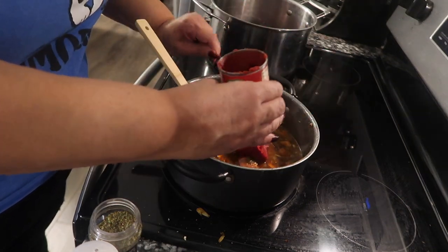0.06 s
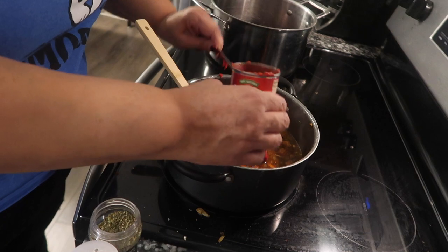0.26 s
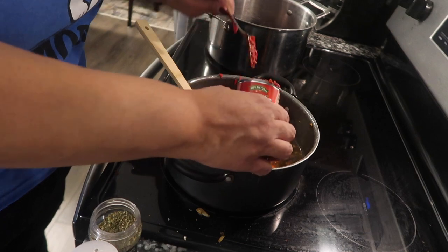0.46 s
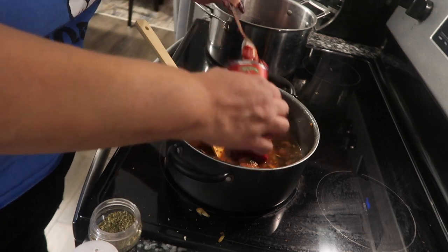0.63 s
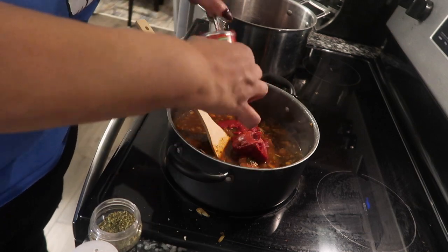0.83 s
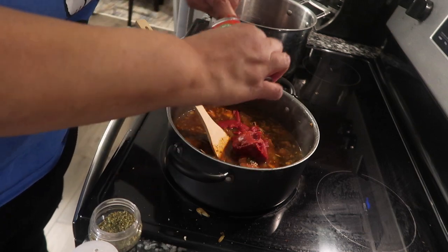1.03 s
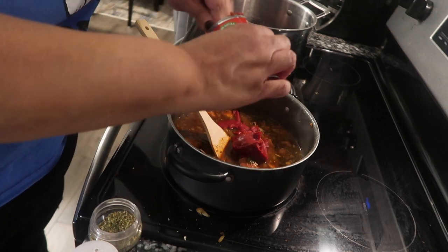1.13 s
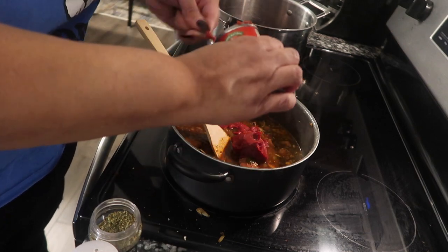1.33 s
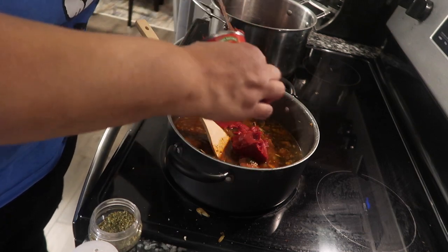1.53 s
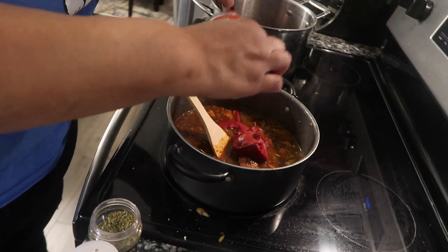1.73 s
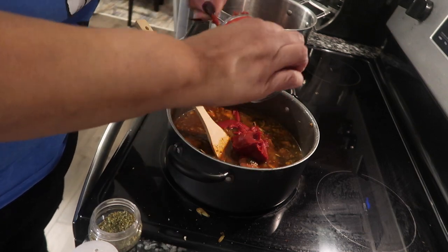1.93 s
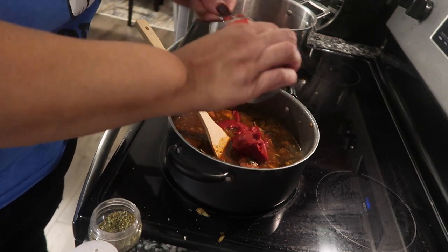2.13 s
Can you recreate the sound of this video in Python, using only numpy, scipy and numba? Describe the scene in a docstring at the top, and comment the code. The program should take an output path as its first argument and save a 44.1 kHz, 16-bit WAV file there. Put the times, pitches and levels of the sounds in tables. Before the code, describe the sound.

A metal spoon scrapes out a small can. A pot-rim knock is already ringing at 0 s; a clean, louder-standing knock follows at 0.17 s. Faint scuffs come near 0.4-0.6 s, then hollow taps and rapid gritty scrapes from 0.8 to 1.5 s, strongest around 1.2. Small handle rubs at 1.55-1.65 s lead to shorter, duller scrapes and taps until 2.15 s. Close stereo, brief kitchen reverberation, quiet low hum slowly swelling.

```python
"""A metal spoon's knock on a pot rim is already ringing, and a second, clean knock soon follows: cracks and pot modes.
The spoon then scuffs, scrapes and taps in a small paste-lined can held in the hand: slips and taps ring its modes.
The home kitchen answers briefly with a tail of dying noise. Room air and an appliance hum, made of filtered noise,
lie underneath; they sink at first, then swell slowly. Two close microphone ports give the stereo picture."""
import sys
import numpy as np
from scipy import signal
from scipy.fft import rfft, irfft, next_fast_len
from scipy.io import wavfile
from scipy.ndimage import uniform_filter1d
from numba import njit

SR = 44100
rng = np.random.default_rng(int(sys.argv[2]) if len(sys.argv) > 2 else 0)


def amplitude_ratio(level_db):
    """Convert a level in decibels to the matching linear amplitude (field) ratio."""
    exponent = np.asarray(level_db, float) / 20
    return 10 ** exponent


def pcm_store(signal):
    """Save signal as 16-bit PCM."""
    levels = np.round(np.clip(np.atleast_2d(signal), -1, 1) * 32767)
    wavfile.write(sys.argv[1], SR, levels.astype(np.int16).T)


N = 96446
LEAD = 4096  # samples run before the first one heard, so that sounds can already be ringing
M = N + LEAD
T = (np.arange(M) - LEAD) / SR  # seconds from the first sample heard

# How far apart the two ports hear the room: (frequency [Hz], side minus mid before a further gain [dB])
SURROUND_SIDE = [(60, -40), (180, -13), (550, -11.5), (1650, -19), (4970, -1), (15000, 10.5)]


def rms_one(x):
    """Scales a signal to an rms of 1."""
    return x / np.sqrt(np.mean(x ** 2) + 1e-20)


def at_hz(points, hz):
    """Reads a (frequency, value) curve along a logarithmic frequency axis."""
    known_hz, values = np.array(points)[:, 0], np.array(points)[:, 1]
    return np.interp(np.log(hz + 1e-9), np.log(known_hz + 1e-9), values)


def band_pass(x, order, edges_hz):
    """Butterworth band-pass."""
    return signal.sosfilt(signal.butter(order, edges_hz, "band", fs=SR, output="sos"), x)


def drift(rate):
    """Slow random wandering with an rms of 1; rate is the corner [Hz] of its two-pole low-pass."""
    r = np.exp(-80 * np.pi * rate / SR)  # computed on every 40th sample
    noise = rng.standard_normal(M // 40 + 1002)
    slow = signal.lfilter([1], [1, -2 * r, r * r], noise)[1000:]
    return np.interp(np.arange(M) / 40, np.arange(len(slow)), rms_one(slow))


def colour(x, spectrum, turn=False):
    """Gives x a dB spectrum: by a causal minimum-phase filter, or with every phase turned a quarter cycle."""
    size = next_fast_len(M + LEAD)
    log_gain = at_hz(spectrum, np.arange(size // 2 + 1) * SR / size) * np.log(10) / 20
    cepstrum = irfft(log_gain, size)
    cepstrum[1:size // 2] *= 2  # folding the cepstrum forward makes the phase minimal
    cepstrum[size // 2 + 1:] = 0
    response = np.exp(rfft(cepstrum))
    if turn:
        response = 1j * np.abs(response)
    return irfft(rfft(x, size) * response, size)[:M]


def ring(clicks, hz, t60):
    """A two-pole resonator: a unit click sets a dying sine of starting height 1 ringing."""
    r = amplitude_ratio(-60 / (max(t60, .003) * SR))
    w = 2 * np.pi * hz / SR
    return signal.lfilter([0, np.sin(w)], [1, -2 * r * np.cos(w), r * r], clicks + 1e-18)


def spikes(s, heights):
    """Single-sample clicks at the given seconds."""
    out = np.zeros(M)
    np.add.at(out, (np.asarray(s) * SR).astype(int) + LEAD, heights)
    return out


def burst(clicks, t60, spectrum):
    """Each click lets off coloured noise that dies away exponentially."""
    dying = signal.lfilter([1], [1, -amplitude_ratio(-60 / (t60 * SR))], np.abs(clicks))
    white = rng.standard_normal(M)
    return colour(dying * white, spectrum) / np.std(colour(white, spectrum))


def knocks():
    """Spoon on pot rim: each hit and its quick bounce let off a crack of noise and ring the pot's modes."""
    # Spoon against the rim: (time [s], relative level [dB])
    hits = [(-.02, -7), (0.1728, -6.5)]
    # Noise of the crack: (frequency [Hz], relative density [dB per Hz])
    crack_spectrum = [(59, -27), (100, -6.5), (367, -7.5), (700, -0.5), (2180, -4.5), (2990, -3),
                      (4640, -25), (7050, -16), (15000, -60.5)]
    # Modes of the pot: (frequency [Hz], relative level [dB], t60 [s])
    pot_modes = [(192.2, -2.5, 0.16), (363.7, -6.5, 0.26), (465, -3, 0.11), (916.4, -4, 0.16),
                 (2430, 9.5, 0.056), (2961, 7.5, 0.061)]
    bounce_s, bounce_db = 0.002, -12
    crack_t60_s, crack_db, pot_db = 0.062, -6, -16.5

    s, db = np.transpose(hits)
    clicks = spikes(s, amplitude_ratio(db)) - spikes(s + bounce_s, amplitude_ratio(db + bounce_db))
    crack = amplitude_ratio(crack_db) * burst(clicks, crack_t60_s, crack_spectrum)
    pot = sum(amplitude_ratio(pot_db + d) * ring(clicks, hz, t60) for hz, d, t60 in pot_modes)
    return crack + pot


def room(x):
    """Kitchen reverberation: dense noise tails dying band by band, one for mid and one for side."""
    # Decay of the kitchen: (frequency [Hz], t60 [s])
    decay = [(500, 0.71), (2500, 0.53), (6000, 0.56), (12000, 0.3)]
    build_up_s = 0.0045

    t = np.arange(SR) / SR
    edges = 60 * 2 ** np.arange(0, 8.1, .5)  # half-octave bands [Hz]
    white = rng.standard_normal((2, 2, SR))
    tails = 0
    for k, (low, high) in enumerate(zip(edges, edges[1:])):
        band = band_pass(white[k % 2], 2, [low, high])  # neighbouring bands use different noise
        tails = tails + band * amplitude_ratio(-60 * t / at_hz(decay, np.sqrt(low * high)))
    tails = tails * np.minimum(t / build_up_s, 1)
    tails = tails / np.sqrt(np.sum(tails[0] ** 2))
    return signal.fftconvolve(x[None], tails, axes=1)[:, :M]


def background():
    """Room air is coloured noise, the hum noise through narrow resonators; mid and side share one level."""
    # Noise of the room air: (frequency [Hz], relative density [dB per Hz])
    air_spectrum = [(40, -9), (64, -9), (140, -15), (333, -19.5), (700, -23.5), (2500, -31.5), (5000, -41),
                    (10800, -56.5), (15500, -70)]
    # Appliance hum: (frequency [Hz], nominal width [Hz], level relative to the air in mid [dB])
    hum_lines = [(57.8, 7.2, 1), (184.3, 6.5, -3.5), (384, 16, -12.5)]
    # Swell of the whole background: (time [s], level [dB])
    swell_points = [(0.0, -44.5), (0.43, -55), (2.19, -42.5)]
    apart_db = 2

    white = rng.standard_normal((3, M))
    air = rms_one(colour(white[0], air_spectrum))
    apart = colour(colour(white[1], air_spectrum), SURROUND_SIDE)
    apart = apart * np.std(air) / np.std(colour(white[0], air_spectrum)) * amplitude_ratio(apart_db)
    hum = sum(amplitude_ratio(d) * rms_one(ring(white[2], hz, 1.9 / width)) for hz, width, d in hum_lines)
    level = np.interp(T, *np.transpose(swell_points))
    return amplitude_ratio(level) * np.array([air + hum, apart])


def grip():
    """Fingers shifting on the can: random rubs ring dull, heavily damped resonators at scattered pitches."""
    # Fingers on the can: (time [s], level [dB])
    finger_level = [(.3, -69), (.7, -75), (1.45, -45.5), (2.19, -64.5)]
    rubs_per_s, low_hz, high_hz, pitches = 260, 280, 1500, 14
    first_cycles, second_cycles = 18, 7.2  # t60 of the two resonators, in cycles

    rubs = (rng.random(M) < rubs_per_s / SR) * amplitude_ratio(np.minimum(rng.exponential(1, M), 3.0))
    dealt = rng.integers(0, pitches, M)  # each rub falls to one pitch
    rings = 0
    for k, hz in enumerate(np.geomspace(low_hz, high_hz, pitches)):
        softened = ring(rubs * (dealt == k), hz, first_cycles / hz)
        rings = rings + ring(softened, hz, second_cycles / hz) * hz
    return rms_one(rings) * amplitude_ratio(np.interp(T, *np.transpose(finger_level)))


def scuffs():
    """Spoon handle on the lip: dying noise rubs one small resonance, pitched a little differently each time."""
    # Small scuffs: (time [s], peak level [dB])
    handle_scuffs = [(0.4115, -42.5), (0.5721, -52.5), (1.5394, -38), (1.5718, -42), (1.595, -49),
                     (1.6257, -45), (1.6606, -34)]
    mode_hz, pitch_spread, mode_t60_s = 1251, 0.027, 0.03
    rub_s = 0.0048  # time constant of the rub

    chance = rng.standard_normal(len(handle_scuffs))
    white = rng.standard_normal(M)
    out = 0
    for (s, db), bent in zip(handle_scuffs, chance):
        rub = np.exp(-np.clip(T - s, 0, 1) / rub_s) * (T > s) * white
        note = ring(rub, mode_hz * (1 + pitch_spread * bent), mode_t60_s)
        out = out + amplitude_ratio(db) * note / np.abs(note).max()
    return out


def strokes():
    """Scraping pressure swells to a peak and lets go, with judder; gains for wall, bottom and treble."""
    # Strokes along the wall; the three times are sorted before use: (start [s], peak [s], end [s],
    # relative level [dB], bottom ring re wall [dB], treble re wall [dB])
    scrapes = [(0.788, 0.795, 0.9, -52, 7, 5.5), (0.801, 0.848, 0.95, -35, -12.5, -6.5),
               (0.907, 0.928, 1.01, -36, -8, -0.5), (0.988, 1.002, 1.083, -28.5, -9, 0.5),
               (1.045, 1.113, 1.32, -33.5, -9, -5.5), (1.13, 1.236, 1.338, -23, -15.5, -10.5),
               (1.396, 1.392, 1.48, -40.5, -20, -2.5), (1.423, 1.486, 1.515, -36, -1, 0),
               (1.692, 1.732, 1.756, -30, 5.5, 0.5), (1.742, 1.793, 1.889, -34.5, 3, 0.5),
               (1.81, 1.899, 1.95, -35.5, 7.5, -1), (1.935, 1.992, 2.073, -37.5, 5.5, 1.5),
               (1.988, 2.041, 2.058, -33.5, -13, 3)]
    shape, judder_db, judder_hz = 1.27, 2, 205

    out = 0
    for *times, db, bottom_db, treble_db in scrapes:
        swell = np.interp(T, np.sort(times), [0, 1, 0]) ** shape
        out = out + swell * amplitude_ratio(db + np.array([[0], [bottom_db], [treble_db]]))
    return out * amplitude_ratio(judder_db * drift(judder_hz))


@njit
def ring_bent(clicks, w, r):
    """A mode whose pitch and damping move while it rings: a complex number turned and shrunk each sample."""
    out, z = np.zeros(len(clicks)), 0j
    for i in range(len(clicks)):
        z = z * r[i] * np.exp(1j * w[i]) + clicks[i]
        out[i] = z.imag
    return out


def patchy(x):
    """Each slice of the treble comes and goes on its own."""
    patch_db, patch_hz = 2.5, 17.8
    edges = np.geomspace(2000, 16000, 10)
    out = 0
    for pair in zip(edges, edges[1:]):
        out = out + amplitude_ratio(patch_db * drift(patch_hz)) * band_pass(x, 2, pair)
    return out


def can():
    """Taps and a dense run of slips strike the same modes; the grip keeps changing which modes speak."""
    # Spoon taps in the can: (time [s], relative level [dB], bottom ring re wall [dB])
    spoon_taps = [(0.8724, -8.5, 10), (0.9503, -16.5, 5.5), (0.9966, -17, -25), (1.1345, -18, -10),
                  (1.207, -23, -0.5), (1.2238, -12, 0), (1.2333, -15.5, 1), (1.2474, -15.5, 0.5),
                  (1.2639, -20, -11), (1.295, -13.5, 1.5), (1.4423, -19, 0), (1.7324, -27, 7.5),
                  (1.7913, -19.5, -18), (2.0263, -15.5, -2.5), (2.1335, -30, -7), (2.1442, -13.5, 0.5)]
    # Can wall, damped by hand and paste: (frequency before bending [Hz], relative level [dB], t60 [s])
    wall_modes = [(1684, -12.5, 0.01), (2190, 4, 0.012), (2440, -39, 0.048), (2412, 4.5, 0.016),
                  (2600, -2, 0.042), (3052, -2, 0.025), (3371, -6, 0.045), (3733, -6.5, 0.021),
                  (4970, -4, 0.0074)]
    # Can bottom and cavity: (frequency before bending [Hz], relative level [dB], t60 before bending [s])
    bottom_modes = [(728, -21.5, 0.12), (837, -4.5, 0.067), (869.3, -8.5, 0.12), (918, -18.5, 0.11),
                    (1049, -16, 0.047)]
    # Hand and spoon bend the tuning: (time [s], bottom pitch [factor], wall pitch [factor],
    # bottom ring length [factor])
    bend_points = [(0.87, 1.076, 1.02, 1.94), (1.1, 0.98, .99, 1.2), (1.699, 0.95, 0.96, 0.87),
                   (2.03, .93, 0.91, 0.94), (2.13, 0.96, 1.004, 0.75)]
    # Noise of ticks and grit: (frequency [Hz], relative density [dB per Hz])
    treble_spectrum = [(2000, -19), (3500, -1.5), (6900, -12), (10500, -31), (11800, -48.5), (14500, -25)]
    tap_db, tick_db, drag_db, grit_db = -13, -24.5, -29, 0
    slips_per_s, slip_spread_db = 2300, 1.5
    mode_drift_db, mode_drift_hz = 4, 13
    wander_share, wander_hz = 0.013, 13.3
    tap_smear_s, tick_rise_s, treble_t60_s = 0.0017, 0.00061, 0.069
    hiss_share = 2.45  # smooth noise against the slips in the grit

    s, db, bottom_db = np.transpose(spoon_taps)
    press = strokes()
    at, *factors = np.transpose(bend_points)
    bottom_pitch, wall_pitch, bottom_length = [np.interp(T, at, f) for f in factors]
    wander = 1 + wander_share * drift(wander_hz)

    slip_heights = amplitude_ratio(slip_spread_db * np.minimum(rng.exponential(1, M), 4))
    slips = (rng.random(M) < slips_per_s / SR) * slip_heights * rng.choice([-1, 1], M)
    slips = rms_one(slips)

    modes = wall_modes + bottom_modes
    late = rng.random((len(s), len(modes))) * tap_smear_s  # wall modes start at scattered moments
    body = 0
    for k, (hz, d, t60) in enumerate(modes):
        if k >= len(wall_modes):
            taps = spikes(s, amplitude_ratio(db + tap_db + bottom_db))
            pressure, pitch, length = press[1], bottom_pitch, bottom_length
        else:
            taps = spikes(s + late[:, k], amplitude_ratio(db + tap_db))
            pressure, pitch, length = press[0], wall_pitch, np.ones(M)
        mode_gain = amplitude_ratio(drag_db + mode_drift_db * drift(mode_drift_hz))
        drag = pressure * np.roll(slips, 97 * k) * mode_gain  # each mode gets the slips at its own offset
        w = 2 * np.pi * hz / SR * pitch * wander
        body = body + amplitude_ratio(d) * ring_bent(taps + drag, w, amplitude_ratio(-60 / (t60 * length * SR)))
    body = band_pass(body, 3, [668, 4000])  # Hz

    tick_clicks = spikes(s + tick_rise_s / 2, amplitude_ratio(db + tick_db))
    tick_clicks = uniform_filter1d(tick_clicks, int(tick_rise_s * SR) + 1)
    ticks = burst(tick_clicks, treble_t60_s, treble_spectrum)
    rough = slips + hiss_share * rng.standard_normal(M)
    grit = colour(press[2] * amplitude_ratio(grit_db) * rough, treble_spectrum)
    return body + ticks + patchy(grit)


def scene():
    """Sums spoon, can, kitchen and background as mid and side, then turns them into left and right."""
    # Difference between the two close ports: (frequency [Hz], side minus mid [dB])
    port_side = [(60, -34), (150, -26), (380, -15), (1500, -44), (5980, -0.5), (15000, 12)]
    knock_room_db, can_room_db, room_side_db = -13.5, -13.5, -4
    right_share = 0.041  # leans the close sounds to the right

    rim = knocks()
    tin = can() + grip() + scuffs()
    close = rim + tin
    wet, wet_side = room(amplitude_ratio(knock_room_db) * rim + amplitude_ratio(can_room_db) * tin)
    mid, side = background()
    side = side - right_share * close + colour(close, port_side, turn=True)
    side = side + amplitude_ratio(room_side_db) * colour(wet_side, SURROUND_SIDE)
    mid = mid + close + wet
    return np.array([mid + side, mid - side])[:, LEAD:]


def top_cut(x):
    """Nothing passes above the cut-off."""
    return signal.sosfilt(signal.butter(12, 15680, fs=SR, output="sos"), x)


def record(dry):
    """A steep low-pass takes off the top: 60 dB down from 15.6 kHz."""
    low_pass = signal.cheby2(10, 60, 15600, fs=SR, output="sos")
    finished = signal.sosfilt(low_pass, dry)
    return top_cut(finished)


dry = scene()
out = record(dry)
pcm_store(out)
```